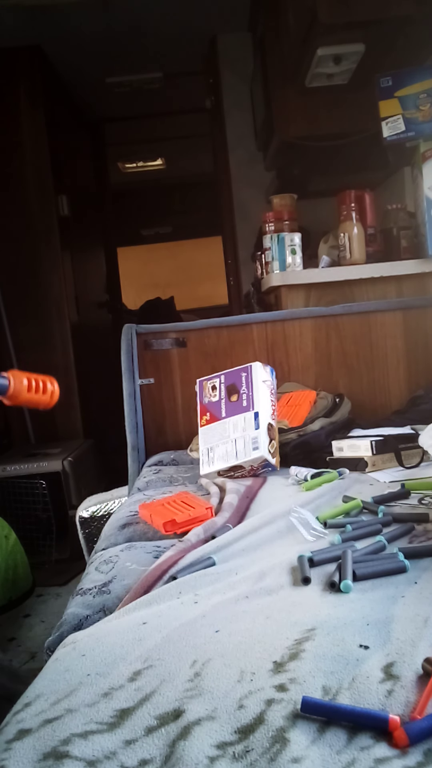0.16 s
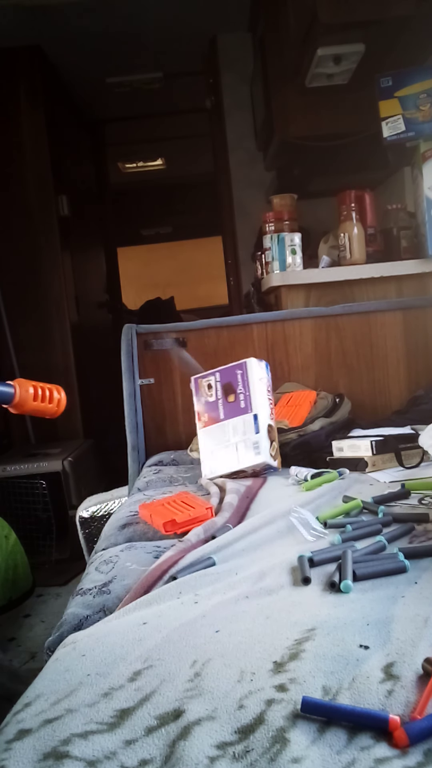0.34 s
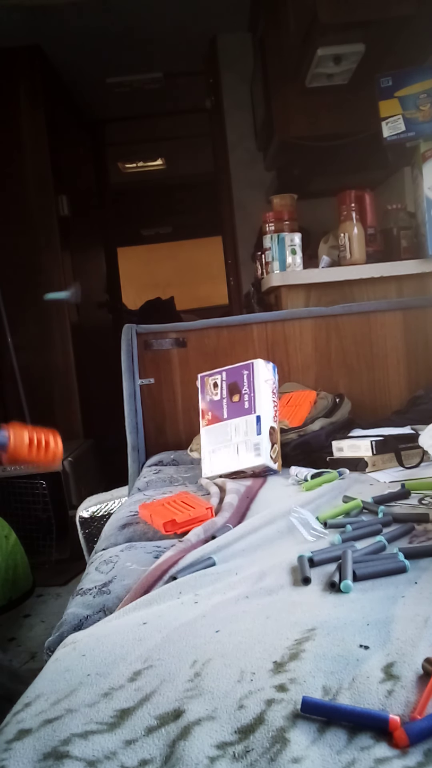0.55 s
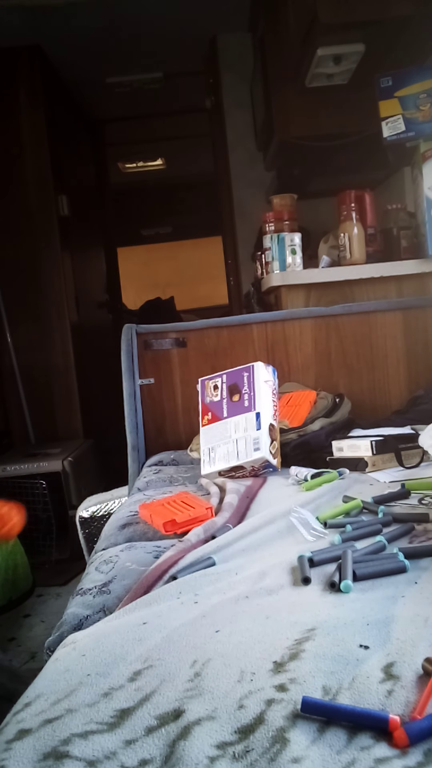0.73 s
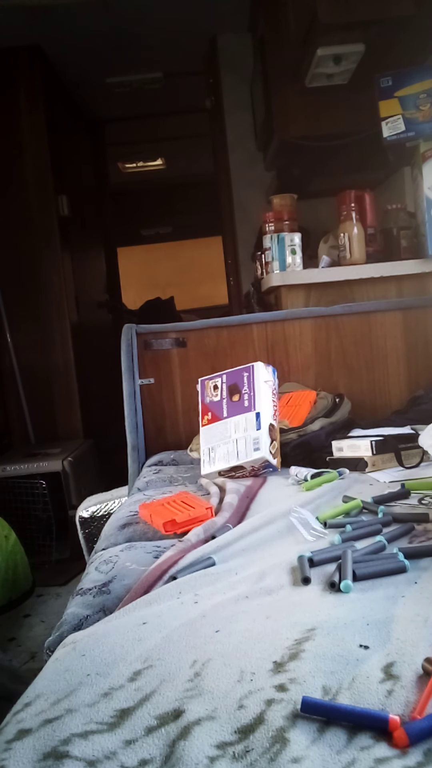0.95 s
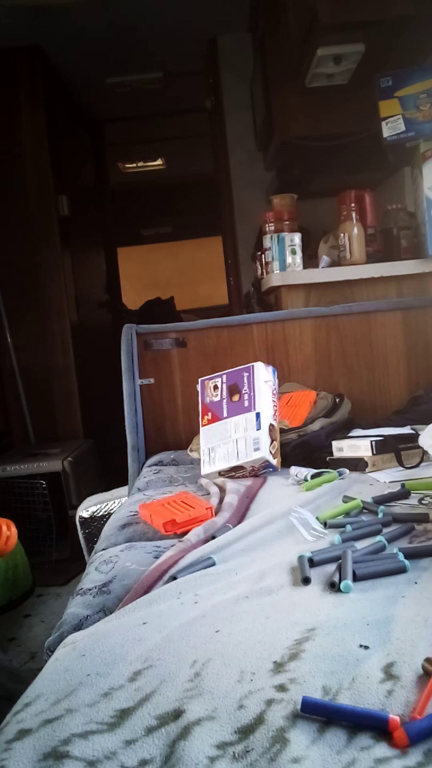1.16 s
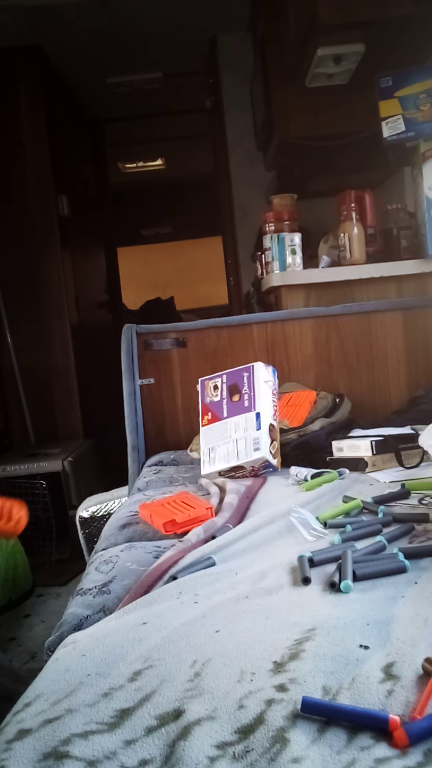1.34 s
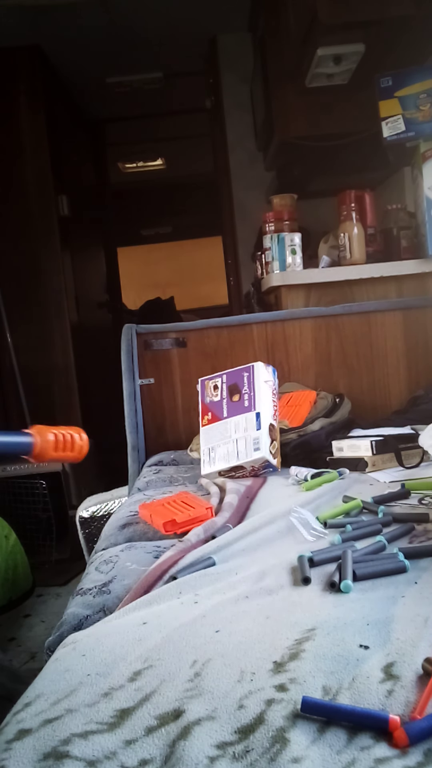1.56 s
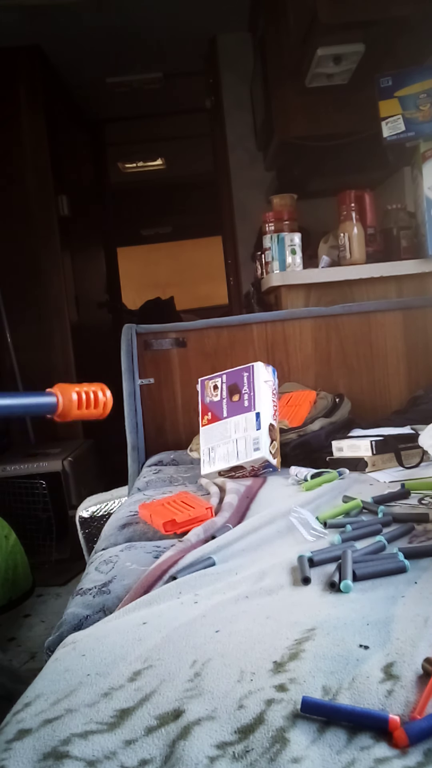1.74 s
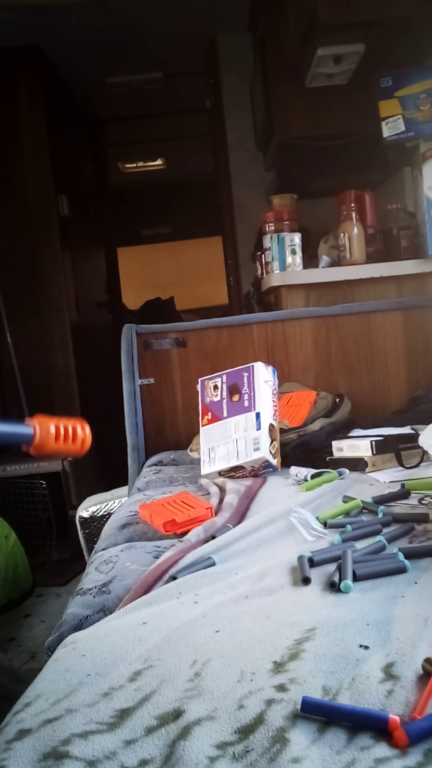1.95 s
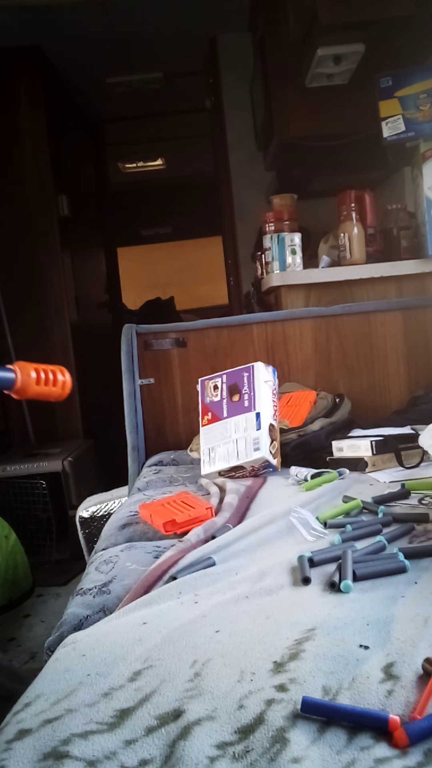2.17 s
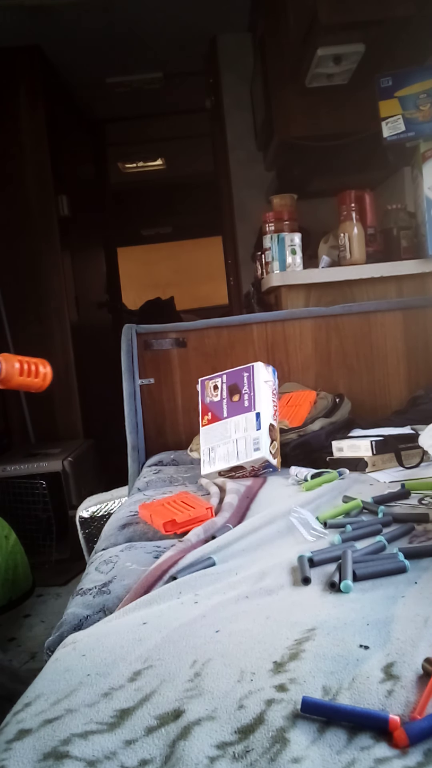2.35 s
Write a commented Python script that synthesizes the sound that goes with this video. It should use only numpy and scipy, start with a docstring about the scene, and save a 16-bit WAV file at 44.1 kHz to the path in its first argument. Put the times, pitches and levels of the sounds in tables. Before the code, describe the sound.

Toy dart blaster shot and cardboard thump up close, followed by hollow plastic clacks and cocking rattles

```python
"""You hear clacks and thumps as a toy foam dart blaster is fired at a cardboard box, then handled and cocked
again, close to a phone in a small soft room. A low hum and a thin whine fill the quiet.
Knocks are dying noise bursts that ring the hollow plastic shell; rattles are crowds of random ticks in it.
The dart's thumps ring the box, thuds are single sine tones, pings are fuzzy narrow-band noise,
and a brushing hand is filtered noise."""
import sys
import numpy as np
from scipy import signal
from scipy.fft import rfft, irfft
from scipy.io import wavfile
from scipy.ndimage import uniform_filter1d

SR = 44100
rng = np.random.default_rng(int(sys.argv[2]) if len(sys.argv) > 2 else 0)


def wrap_up_sound(samples):
    """Save the sound to the file named by the first command line argument, as 16-bit audio."""
    columns = np.atleast_2d(samples).T
    # keep every value between -1 and 1, then stretch to whole-number steps
    tamed = np.clip(columns, -1, 1)
    steps = np.round(tamed * 32767).astype(np.int16)
    wavfile.write(sys.argv[1], SR, steps)


N = 110250  # samples: 2.5 seconds

# Levels of the near sounds are those before the room and the microphone. A "fade time" is the time to drop 60 dB.

# Background hiss shape. Each row: frequency in Hz, strength in dB.
HISS_SHAPE = [(15, -40), (30, 2), (90, 5), (242, -4), (818, -7), (4870, -16.5), (6210, -14.5),
              (7920, -28.5), (13000, -27.5), (15800, -23), (16100, -55)]
# The low rumble comes and goes. Each row: time in seconds, level in dB.
HUM_LEVELS = [(0, -63.5), (.2, -68.5), (.39, -55.5), (.45, -78), (.59, -64), (.8, -71), (.97, -85),
              (1.021, -62.5), (1.129, -89), (1.201, -65), (1.32, -78.5), (1.62, -73.5), (1.76, -67),
              (1.8, -72), (1.929, -100), (2.001, -72), (2.149, -69.5), (2.5, -70)]
# How long the room rings. Each row: frequency in Hz, fade time in seconds.
ROOM_FADES = [(150, .3), (400, 0.29), (1040, 0.1), (2760, 0.21), (7280, 0.042), (15000, 0.23)]
# What the microphone lets through. Each row: frequency in Hz, gain in dB.
MIC_RESPONSE = [(100, -17.5), (300, -2.5), (600, -0.5), (6500, -1), (8000, -13.5), (10500, -22),
                (13500, -32.5), (15000, -17.5), (15850, -18.5), (16100, -46)]
# A hand brushes along. Each row: time in seconds, level in dB, centre in Hz.
SWISH = [(1.0, -87.5, 5580), (1.054, -64.5, 4830), (1.114, -56.5, 4090), (1.134, -61.5, 3630),
         (1.169, -83, 3600)]
# Parts sliding and rattling, one curve per stretch of rattling; some stretches run on into the next.
# Each row: time in seconds, level in dB before RATTLE_DB is added, treble minus level in dB.
RATTLES = [
    [(.2405, -29, 6.5), (.246, -17.5, -8.5), (.28, -42.5, -0.5)],
    [(.303, -27.5, -13), (.35, -46, -8.5), (.398, -61, -5)],
    [(.4, -44, 3), (.41, -34.5, 10), (.426, -53.5, 9), (.434, -34.5, 7.5), (.458, -44.5, 3.5),
     (.54, -71.5, -5)],
    [(.847, -63.5, -7), (.862, -45.5, -2), (.88, -37.5, 4), (.965, -87, 0)],
    [(1.19, -75.5, 0.5), (1.205, -62, -4.5), (1.24, -75, -3)],
    [(1.285, -69, 3), (1.31, -51, -0.5), (1.33, -49, -8.5), (1.375, -43, 5), (1.42, -50, 2),
     (1.44, -42, -9), (1.488, -49.5, 1), (1.51, -38, 3), (1.536, -44, 6), (1.546, -36.5, 12.5),
     (1.575, -50.5, 9), (1.62, -46, -0.5), (1.66, -54, 1), (1.72, -50, 1.5), (1.76, -54, -3),
     (1.8, -52.5, -0.5)],
    [(1.8, -51.5, 0), (1.815, -36, 5), (1.836, -31.5, -12), (1.858, -37.5, 11.5), (1.868, -28, 0.5),
     (1.9, -41.5, 1.5), (1.965, -63, 2.5), (2.01, -67.5, 11.5), (2.045, -78.5, 5), (2.08, -73, 2.5),
     (2.1, -88, 5.5)],
    [(2.146, -63.5, -6.5), (2.153, -72, -5), (2.175, -56.5, -14.5), (2.21, -76, -16)],
    [(2.301, -68, 9), (2.312, -58, 1.5), (2.334, -52, -3.5), (2.36, -67, 2)],
    [(2.41, -67, -7.5), (2.438, -76, 5), (2.452, -68, 7.5), (2.5, -76.5, 6)],
]
# The slide drags on its spring. Each row: time in seconds, level in dB.
RASP_LEVELS = [(1.57, -79), (1.6, -50.5), (1.72, -56), (1.745, -72), (1.775, -48.5), (1.8, -59)]
# Resonances of the hollow shell, low and high. Each row: frequency in Hz, width in Hz, relative strength in dB.
SHELL_LOW = [(420, 680, -12), (810, 220, -5.5), (1074, 200, 2), (1400, 500, 0), (1900, 480, 3),
             (2300, 1200, -3.5)]
SHELL_HIGH = [(3060, 500, 2), (3730, 2180, 2), (4640, 1600, 5.5), (6200, 3200, 0.5), (13900, 7900, -5)]
# Low weight under the blows, the first being the air shoved out of the barrel.
# Each row: start in seconds, level in dB, pitch in Hz, fade time in seconds.
THUDS = [(.242, -15.5, 187, 0.031), (0.245, -28, 470, 0.098), (0.874, -39, 233, 0.04),
         (1.305, -61, 460, 0.091), (1.361, -42, 462, 0.038), (1.496, -47, 353, 0.13),
         (1.821, -37.5, 377, 0.062), (1.827, -40.5, 145, 0.079), (2.366, -41, 400, 0.035),
         (2.368, -40, 703, 0.021)]
# Faint fuzzy rings, perhaps the spring, and a soft rustle near 540 Hz.
# Each row: start in seconds, level in dB, pitch in Hz, fade time in seconds.
PINGS = [(.53, -66.5, 830, 0.29), (.56, -70.5, 537, 0.25), (.555, -65, 1596, 0.11),
         (.688, -74, 1948, 0.093), (2.062, -67.5, 1960, 0.106), (2.254, -57, 1430, 0.073)]
# The dart lands on the box and bounces. Each row: start in seconds, peak level of the box ring in dB.
THUMPS = [(.2842, -9.5), (.2866, -14), (.2892, -8), (0.2956, -17), (0.2977, -11.5), (.2998, -17.5)]
# Tones of the cardboard box. Each row: pitch in Hz, relative strength in dB, fade time in seconds.
BOX_TONES = [(570, -14, .03), (685, 1.5, 0.038), (830, -11, .04), (985, -1.5, 0.019), (1140, -4.5, 0.0057),
             (1550, -8.5, 0.039), (3400, -23.5, .015)]
# Plastic parts knocking. Each row: start in seconds, peak level of ring and shell in dB, ring pitch in Hz,
# shell treble against the ring in dB, sharp tick against both in dB, fade time of the driving burst in seconds.
CLACKS = [(0.2407, -17.5, 4060, 3, -5.5, 0.068), (0.2458, -13.5, 1632, -3.5, -6.5, 0.02),
          (0.2468, -12.5, 1300, -4.5, -1.5, .025), (0.2531, -17, 1400, 4, -5, 0.088),
          (0.4033, -20.5, 3010, 27, -5.5, 0.2), (0.4071, -24, 4400, 25, 5, 0.017),
          (0.4114, -29, 3280, -4, -8, 0.015), (0.4289, -20, 1770, -2.5, -7, 0.051),
          (0.4361, -24, 1350, -4.5, -3.5, 0.029), (0.4419, -22.5, 1900, 5, -9, 0.074),
          (.853, -35.5, 2240, -1, -4, 0.053), (.866, -28.5, 2240, -5, -5, 0.018),
          (.8745, -20.5, 2350, 1, -11, 0.033), (0.8795, -24, 2550, 1, -17, 0.019),
          (1.198, -52.5, 1430, 1, -9.5, 0.026), (1.308, -36.5, 814, -5, -23, 0.044),
          (1.315, -37.5, 1470, -20.5, -22, 0.046), (1.333, -31.5, 3020, 30, 5, 0.13),
          (1.355, -32, 1540, 1.5, -13, 0.15), (1.366, -27.5, 2030, 2, -14, 0.028),
          (1.3715, -26.5, 3260, -10, 1, 0.065), (1.388, -30, 1450, 8, -3.5, 0.042),
          (1.427, -48, 1180, -3, -26, 0.074), (1.4494, -37, 2850, -11, -13, 0.12),
          (1.492, -33.5, 830, 0, -23, 0.1), (1.5017, -29.5, 1940, -16, -6, 0.033),
          (1.5227, -27.5, 1460, -13, -3, 0.16), (1.5289, -25.5, 1480, -15, -16, 0.02),
          (1.539, -14, 2260, 3, -9.5, 0.037), (1.5465, -27.5, 2880, 1, -16, 0.031),
          (1.62, -54, 1400, -0.5, 3.5, 0.027), (1.8148, -22.5, 1400, 1.5, -18, 0.09),
          (1.827, -18, 2760, 1, -4, 0.093), (1.8342, -21, 1550, -7, -2, 0.025),
          (1.8494, -19.5, 1076, 2, 4, 0.046), (1.8602, -20, 1130, -2, 7, .04),
          (1.8657, -19, 1223, 2.5, -1, 0.021), (2.149, -46, 1330, -38, -22.5, 0.042),
          (2.151, -48, 2850, -20.5, -15.5, 0.06), (2.3032, -42, 4900, 2.5, -20, .025),
          (2.308, -49.5, 1214, -20, -21, 0.097), (2.322, -47.5, 1540, -6, -12.5, 0.096),
          (2.3647, -36, 2820, -12, 3.5, 0.063), (2.3692, -35.5, 1516, -2.5, -32, 0.071),
          (2.418, -56, 3220, -16.5, -17, 0.093), (2.447, -47.5, 2100, -6, -23, 0.11)]

HISS_DB = -76.5
HUM_HZ, HUM_WIDTH_HZ = 108, 69
WHINE_HZ, WHINE_WIDTH_HZ, WHINE_DB = 6150, 60, -82  # the width is the typical pitch drift
ROOM_DB, ROOM_GAP_S = -12, 0.0036  # the gap is the silence before the room answers
EDGE_HZ = 16550  # almost nothing is heard above this
START_DB, START_HZ, START_T60_S = -59, 595, 0.13  # an earlier knock dying away
SWISH_WIDTH_HZ = 2200
TICKS_PER_S, TICK_SPREAD_DB = 4000, 2.3
CLUMP_DB, CLUMP_S = 1.2, .006  # each shell resonance swells and sinks on its own
RATTLE_DB = -3
RASP_HZ, RASP_WIDTH_HZ = 1350, 250
SWELL_S, PING_WIDTH_HZ = .003, 72
THUMP_S = 0.00025  # softness of the foam blow
SLAP_DB, SLAP_T60_S = -15, .024  # noisy slap added to each thump
RING_Q, CLACK_RISE_S = 5.9, 0.00069
STRIKE_DB = 17  # clean blow over the noisy burst
TICK_HZ, TICK_WIDTH_HZ = 4200, 5000
FIZZ_DB, FIZZ_T60_S = -22, 0.006  # short noise that follows the click
AIR_HZ, AIR_DB = 15000, 7  # top sparkle of a tick


def amp(db):
    """Turns decibels into a multiplier."""
    return 10 ** (np.asarray(db) / 20)


def evened(x):
    """Scales a sound to an average (RMS) strength of 1."""
    return x / np.sqrt(np.mean(x ** 2) + 1e-20)


def peaked(x):
    """Scales a sound to a peak of 1."""
    return x / abs(x).max()


def read(points, hz):
    """Reads a frequency table between its rows, on a logarithmic pitch scale."""
    f, value = np.transpose(points)
    return np.interp(np.log(hz + 1), np.log(f + 1), value)


def add(mix, s, sound):
    """Adds a sound to the mix at s seconds, cut off at the end of the mix."""
    part = mix[round(s * SR):][:len(sound)]
    part += sound[:len(part)]


def coloured(x, points):
    """Makes each frequency louder or softer by a table of Hz and dB."""
    gain = amp(read(points, np.fft.rfftfreq(len(x), 1 / SR)))
    return irfft(rfft(x) * gain, len(x))


def resonate(x, hz, width):
    """Favours the pitches around hz, which may move, with a gain of 1 at the centre."""
    turn = np.exp(2j * np.pi * np.cumsum(hz * np.ones(len(x))) / SR)
    r = np.exp(-np.pi * width / SR)
    # Shift the centre down to zero, smooth, then shift it back up.
    smooth = signal.lfilter([1 - r], [1, -r], x / turn + 1e-18)
    return 2 * (turn * smooth).real


def body(x, table, clumps_db=0):
    """Rings a hollow body: a bank of steep resonances with alternating signs."""
    gains = amp(clumps_db + np.array(table)[:, 2:])
    total = 0
    for k, ((hz, width, _), gain) in enumerate(zip(table, gains)):
        ring = resonate(resonate(x, hz, width), hz, 3 * width)
        total = total + (-1) ** k * gain * ring / np.sqrt(width)
    return total


def floor():
    """Quiet shaped hiss, a low rumble of resonant noise and a thin sine whine with drifting pitch."""
    hiss_noise, hum_noise, drift_noise = rng.standard_normal((3, N))
    hiss = amp(HISS_DB) * evened(coloured(hiss_noise, HISS_SHAPE))
    hum = evened(resonate(resonate(hum_noise, HUM_HZ, HUM_WIDTH_HZ), HUM_HZ, HUM_WIDTH_HZ))
    hum *= amp(np.interp(np.arange(N) / SR, *np.transpose(HUM_LEVELS)))
    drift_hz = WHINE_WIDTH_HZ * evened(uniform_filter1d(drift_noise, size=400))
    whine = np.sin(2 * np.pi * np.cumsum(WHINE_HZ + drift_hz) / SR) * amp(WHINE_DB)
    return hiss + hum + whine


def room(x):
    """Echoes blur into a noise tail, each band dying at its own speed."""
    taps = rng.standard_normal(SR // 2) * (np.arange(SR // 2) > ROOM_GAP_S * SR)
    hz, t, bands = signal.stft(taps, SR, nperseg=128)
    fading = bands * amp(-60 * t / read(ROOM_FADES, hz)[:, None])
    tail = signal.istft(fading, SR, nperseg=128)[1]
    return signal.fftconvolve(x, tail / np.linalg.norm(tail))[:N]


def earlier_knock():
    """An earlier knock still fading at the start: resonant noise that dies away."""
    ring = evened(resonate(resonate(rng.standard_normal(N), START_HZ, 200), START_HZ, 540))
    return ring * amp(START_DB - 60 * np.arange(N) / SR / START_T60_S)


def swish():
    """Soft friction of a hand: noise through a wide resonance whose centre sinks."""
    t, (s, db, hz) = np.arange(N) / SR, np.transpose(SWISH)
    centre_hz = np.interp(t, s, hz)
    hiss = resonate(rng.standard_normal(N), centre_hz, SWISH_WIDTH_HZ)
    hiss = evened(resonate(hiss, centre_hz, 2 * SWISH_WIDTH_HZ))
    return hiss * amp(np.interp(t, s, db, -120, -120))


def random_ticks():
    """Tiny contacts at random moments, uneven in strength and random in sign."""
    strength = amp(TICK_SPREAD_DB * np.minimum(rng.exponential(1, N), 4))
    happens = rng.random(N) < TICKS_PER_S / SR
    return strength * happens * rng.choice([-1, 1], N)


def rasp(ticks):
    """The slide drags on its spring: the ticks squeezed into a narrow pitch range."""
    sound = evened(resonate(resonate(ticks, RASP_HZ, RASP_WIDTH_HZ), RASP_HZ, 2 * RASP_WIDTH_HZ))
    return sound * amp(np.interp(np.arange(N) / SR, *np.transpose(RASP_LEVELS), -120, -120))


def rattles(ticks):
    """Dense ticks ring the low and high shell while parts move."""
    t, out = np.arange(N) / SR, np.zeros(N)
    span = round(CLUMP_S * SR)
    wander = rng.standard_normal((len(SHELL_LOW + SHELL_HIGH), N))
    clumps_db = CLUMP_DB * evened(uniform_filter1d(uniform_filter1d(wander, span), span))
    low = evened(body(ticks, SHELL_LOW, clumps_db[:len(SHELL_LOW)]))
    high = evened(body(ticks, SHELL_HIGH, clumps_db[len(SHELL_LOW):]))
    for curve in RATTLES:
        s, db, treble_db = np.transpose(curve)
        moving = (t >= s[0]) & (t < s[-1])
        level = amp(RATTLE_DB + np.interp(t, s, db))
        out += moving * level * (low + amp(np.interp(t, s, treble_db)) * high)
    return out


def thuds():
    """Low weight under the blows: sine tones that swell quickly and die."""
    out, t = np.zeros(N), np.arange(SR // 4) / SR
    for s, db, hz, t60 in THUDS:
        swell = np.minimum(t / SWELL_S, 1)
        add(out, s, swell * amp(db - 60 * t / t60) * np.sin(2 * np.pi * hz * t))
    return out


def pings():
    """Faint fuzzy rings and a rustle: noise squeezed around one pitch, swelling quickly and dying."""
    out, t = np.zeros(N), np.arange(SR // 4) / SR
    for (s, db, hz, t60), fuzz in zip(PINGS, rng.standard_normal((len(PINGS), len(t)))):
        swell = np.minimum(t / (2 * SWELL_S), 1)
        ring = evened(resonate(resonate(fuzz, hz, PING_WIDTH_HZ), hz, 2 * PING_WIDTH_HZ))
        add(out, s, swell * amp(db - 60 * t / t60) * ring)
    return out


def dart_thumps():
    """Soft foam blows ring the box's tones, each with a noisy slap."""
    out, t = np.zeros(N), np.arange(4096) / SR
    ring = sum(amp(db - 60 * t / t60) * np.cos(2 * np.pi * hz * t) for hz, db, t60 in BOX_TONES)
    soft_push = np.exp(-(t / THUMP_S - 2) ** 2)
    blow = peaked(signal.fftconvolve(np.diff(ring, prepend=0), soft_push)[:len(t)])
    for (s, db), noise in zip(THUMPS, rng.standard_normal((len(THUMPS), len(t)))):
        slap = amp(SLAP_DB - 60 * t / SLAP_T60_S) * noise
        add(out, s, amp(db) * (slap - blow))
    return out


def clacks():
    """Each knock is a dying burst: a ring at its own pitch, the brighter shell and a sharp tick."""
    out, t = np.zeros(N), np.arange(4096) / SR
    click = t == 0  # a single sample
    bursts = rng.standard_normal((len(CLACKS), len(t)))
    for (s, db, hz, treble_db, tick_db, t60), burst in zip(CLACKS, bursts):
        dying_burst = burst * np.minimum(t / CLACK_RISE_S, 1) * amp(-60 * t / t60)
        drive = dying_burst + amp(STRIKE_DB) * click
        ring_width = 2 * hz / RING_Q
        ring = resonate(resonate(drive, hz, ring_width), hz, ring_width)
        shell = body(drive, SHELL_HIGH)
        knock = peaked(evened(ring) + amp(treble_db) * evened(shell))
        snap = click + burst * amp(FIZZ_DB - 60 * t / FIZZ_T60_S)
        tick = peaked(resonate(resonate(snap, TICK_HZ, TICK_WIDTH_HZ), TICK_HZ, TICK_WIDTH_HZ))
        tick = tick + amp(AIR_DB) * resonate(snap, AIR_HZ, TICK_WIDTH_HZ)
        add(out, s, amp(db) * (knock - amp(tick_db) * tick))
    return out


def scene():
    """Near sounds and their room tail pass the microphone's colouring; the background joins after it."""
    ticks = random_ticks()  # the rattles and the rasp share the same contacts
    near = earlier_knock() + swish() + rasp(ticks) + rattles(ticks)
    near = near + thuds() + pings() + dart_thumps() + clacks()
    heard = coloured(near + amp(ROOM_DB) * room(near), MIC_RESPONSE)
    return (heard + floor())[None]


def record(dry):
    """Removes the highest treble with a steep low-pass filter."""
    low_pass = signal.firwin(511, EDGE_HZ, window=("kaiser", 9), fs=SR)
    return signal.oaconvolve(dry, low_pass[None], "same")


dry = scene()
out = record(dry)
wrap_up_sound(out)
```